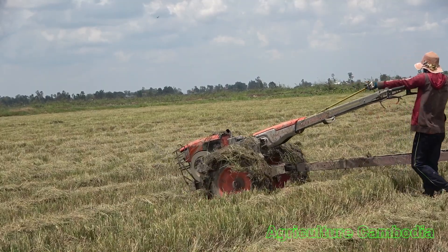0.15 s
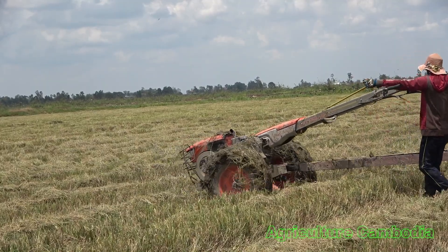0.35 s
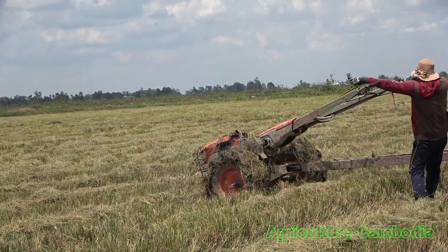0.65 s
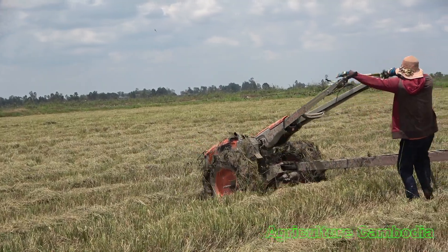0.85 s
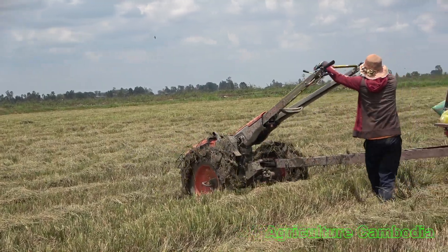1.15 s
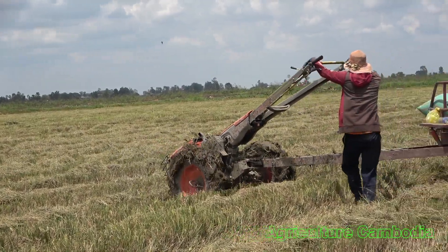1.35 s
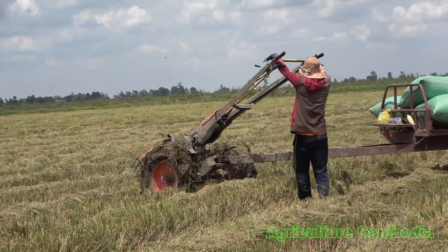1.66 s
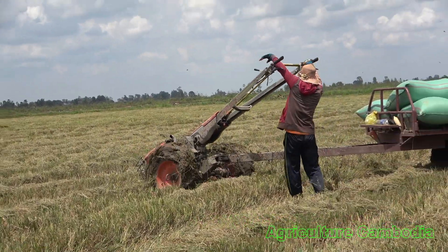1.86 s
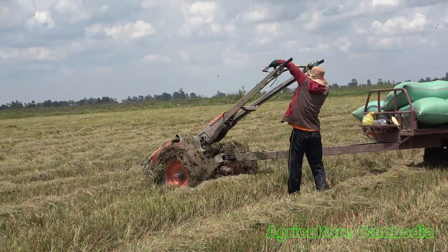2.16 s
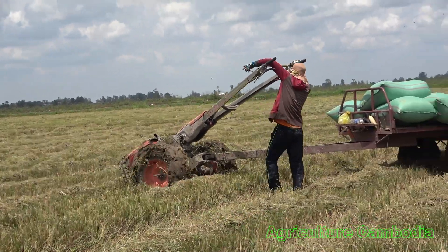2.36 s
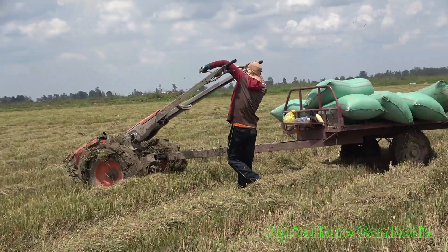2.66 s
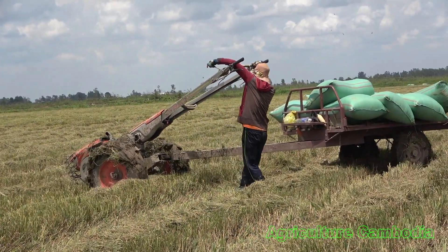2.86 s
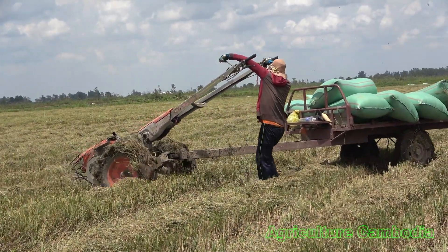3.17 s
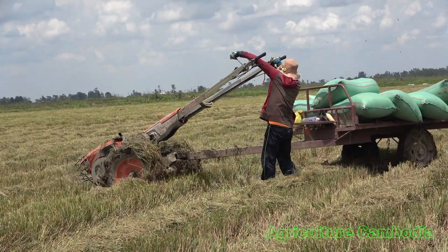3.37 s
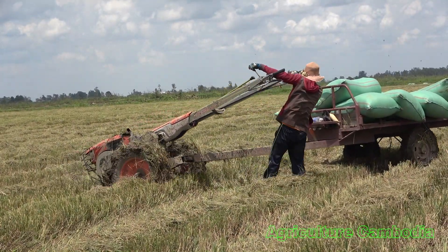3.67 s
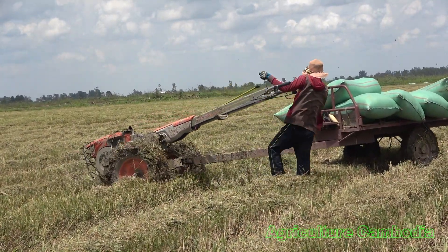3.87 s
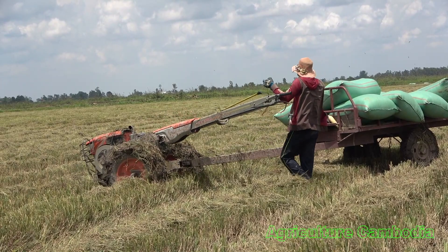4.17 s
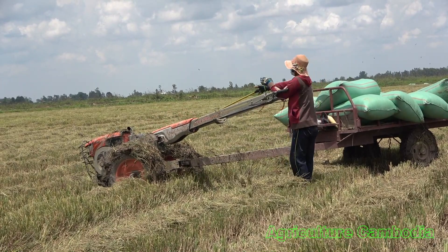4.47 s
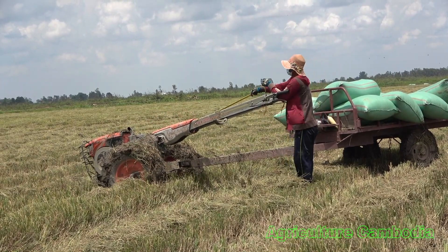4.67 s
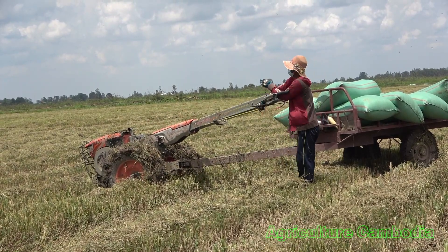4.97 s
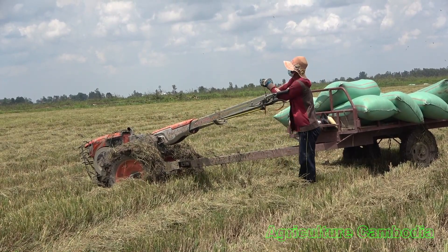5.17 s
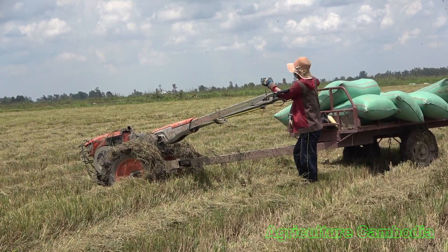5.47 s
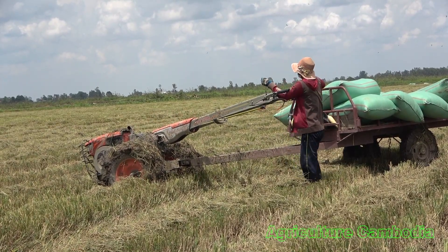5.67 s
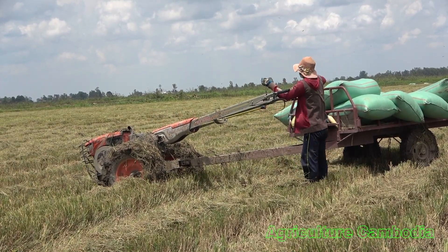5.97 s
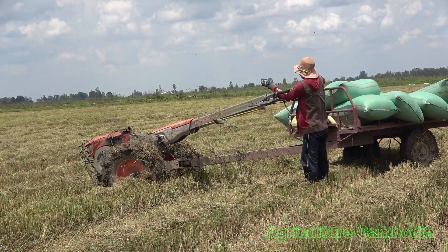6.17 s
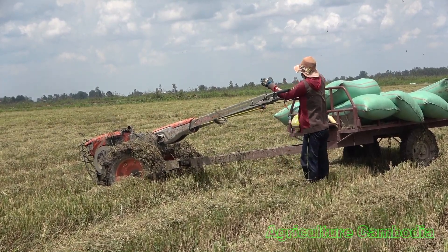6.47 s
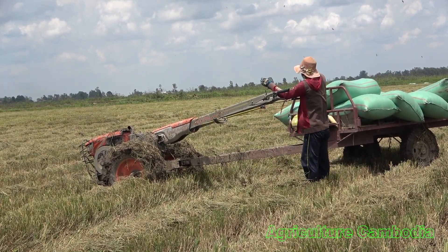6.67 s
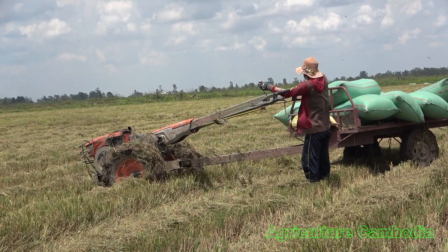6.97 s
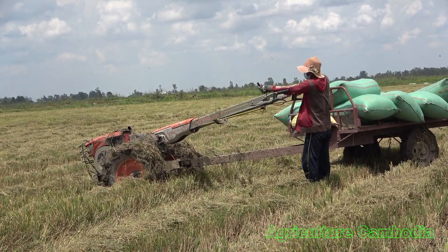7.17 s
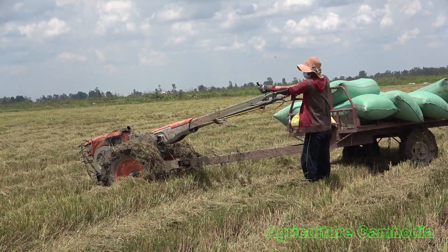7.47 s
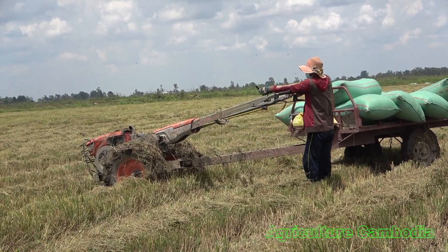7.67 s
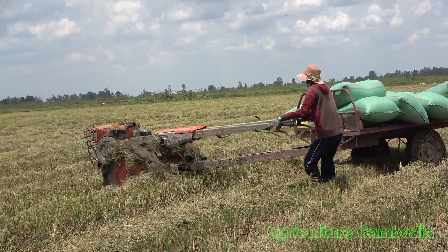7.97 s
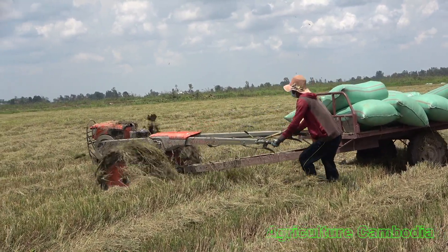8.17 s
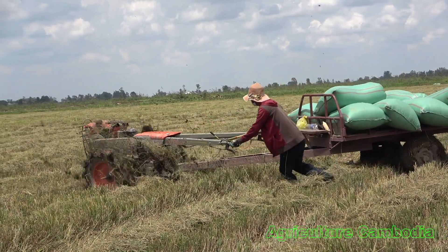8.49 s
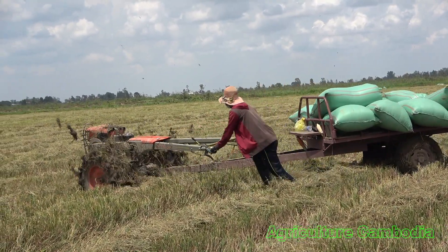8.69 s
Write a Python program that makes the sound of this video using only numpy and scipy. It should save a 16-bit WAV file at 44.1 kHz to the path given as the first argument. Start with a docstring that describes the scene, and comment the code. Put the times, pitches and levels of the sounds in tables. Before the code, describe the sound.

A single-cylinder diesel walking tractor thuds along in a windy field, coasts down to slow clattering puffs, then is throttled up into a fast hammering roar.

```python
"""A single-cylinder diesel walking tractor hauls a trailer over a windy field: it plods, coasts down, then is opened up.
Each cycle brings piston slap, an injector snap, the combustion knock, the exhaust valve, a puff and a tappet tick:
timed impulses and noise bursts that ring the crankcase or the pipe. Gears churn and whine as noise and a wavering tone.
A loose cover buzzes and the hitch clanks a few times; shaped noise makes the straw, the wind and its pops."""
import sys
import numpy as np
from scipy import signal
from scipy.fft import rfft, irfft
from scipy.io import wavfile
from scipy.ndimage import uniform_filter1d

SR = 44100
rng = np.random.default_rng(int(sys.argv[2]) if len(sys.argv) > 2 else 0)


def master_out(mix):
    """Clip the mix to full scale and print it as 16-bit PCM to the path in sys.argv[1]."""
    frames = np.transpose(np.atleast_2d(mix))
    ceiling = np.clip(frames, -1, 1)
    pcm = np.round(ceiling * 32767).astype(np.int16)
    wavfile.write(sys.argv[1], SR, pcm)


N = 389403
TIME = np.arange(N) / SR  # s

# engine speed: start_s, firings_per_s
SPEED = [(0.0, 11.404), (0.4, 12.828), (0.75, 13.789), (1.5, 13.42), (2.4, 13.411), (3.05, 13.663),
         (3.5, 12.739), (4.2, 11.693), (4.8, 10.827), (5.3, 10.201), (5.8, 9.623), (6.03, 9.636),
         (6.25, 11.295), (6.55, 13.061), (6.9, 15.292), (7.25, 17.38), (7.6, 19.348), (7.9, 20.59),
         (8.15, 20.034), (8.45, 20.441), (8.83, 20.763)]
# ring of the crankcase and its covers: pitch_hz, width_hz, level_db above the broad response
CASE = [(1210.5, 125, 12), (1580, 57, -4.5), (3156, 250, 0), (4660, 530, -1.5), (5450, 560, 3.5),
        (6880, 380, 7.5), (11100, 1500, -14)]
# ring of the air cleaner and rocker cover: pitch_hz, width_hz, level_db above the broad response
COVER = [(571, 49, 14.5), (1480, 48, 7)]
# tone of the small hard parts, injector and tappet: pitch_hz, level_db
TAPPET_COLOUR = [(1000, -29), (4000, -6), (7000, 6.5), (11000, 9), (15500, -3.5)]
# how the knock follows the work: level_db when plodding without fuel, full_fuel_db added, db_per_extra_firing_per_s
KNOCK_LAW = (-55, 39.45, .05)
# level of the mechanical clatter as the tractor turns and pitches: start_s, level_db
CLATTER = [(0, -2), (2.0, -1.7), (2.7, 3), (3.5, -1.5), (5.6, 1.7), (6.1, 3.5), (6.8, -2), (8.0, 1.5),
           (8.83, -.8)]


def undb(db):
    """Turn decibels into a gain."""
    return 10 ** (np.asarray(db) / 20)


def curves(table):
    """Draw straight lines between a table's rows: each column at every sample."""
    s, *columns = np.transpose(table)
    return [np.interp(TIME, s, column) for column in columns]


def noise():
    """White noise of unit level."""
    return rng.standard_normal(N)


def walk(rate):
    """Random levels held 1 / rate seconds and smoothed twice; spread near 1."""
    hold = int(SR / rate)
    steps = np.repeat(noise()[:N // hold + 1], hold)
    smooth = uniform_filter1d(uniform_filter1d(steps, hold), hold)
    return np.sqrt(2) * smooth[:N]


def resonance(f, hz, width):
    """Complex response of one damped ringing mode, gain 1 at its centre."""
    return 1j * f * width / (hz ** 2 - f ** 2 + 1j * f * width)


def response(colour, modes=(), size=8192):
    """Impulse response of unit energy: a broad colour with resonant peaks on top."""
    f = np.arange(size // 2 + 1) * SR / size + 1
    hz, db = np.transpose(colour)
    broad = undb(np.interp(np.log(f), np.log(hz), db))
    peaks = sum(np.abs(undb(d) * resonance(f, c, w)) ** 2 for c, w, d in modes)
    gain = broad * np.sqrt(1 + peaks)
    # folding the cepstrum puts all the ringing after the blow
    cepstrum = irfft(np.log(gain))
    ir = irfft(np.exp(rfft(2 * cepstrum[:size // 2], size)))
    return ir / np.linalg.norm(ir)


def ring(x, ir):
    """Let a signal ring through an impulse response."""
    return signal.oaconvolve(x, ir)[:N]


def lowpass(x, hz, order=2):
    """Round off the treble."""
    return signal.sosfilt(signal.butter(order, min(hz, SR / 3), fs=SR, output="sos"), x)


def effort(law):
    """Level in dB of an engine sound that follows fuel and engine speed."""
    # fuel: a blip, part load, cut while coasting, then wide open: start_s, fuel_share (0-1)
    fuel_table = [(.07, 0.24), (.15, 0.64), (.55, 0.62), (.9, .42), (1.25, 0.26), (1.75, 0.53), (1.95, .38),
                  (2.3, 0.54), (3.0, 0.43), (3.35, 0), (6.02, 0.12), (6.08, 0.83), (6.95, 1), (7.3, .95),
                  (7.7, 0.95), (8.1, 0.95), (8.45, 0.96), (8.83, 0.66)]
    plod_per_s = 13  # firings a second at plodding speed
    base_db, fuel_db, speed_db = law
    fuel, = curves(fuel_table)
    rate, = curves(SPEED)
    return base_db + fuel_db * np.clip(fuel, 0, 1) + speed_db * (rate - plod_per_s)


def strokes(crank, angle, scatter_db, jitter_s, lead_s=0):
    """One impulse a cycle at a crank angle (in cycles), uneven in size and timing."""
    cycles = np.arange(np.ceil(crank[0] - angle), crank[-1] - angle)
    size, late = rng.standard_normal((N // 1000, 2))[:len(cycles)].T
    at_s = np.interp(cycles + angle, crank, TIME) + jitter_s * late - lead_s
    train = np.zeros(N)
    train[np.clip((at_s * SR).astype(int), 0, N - 1)] = undb(scatter_db * size)
    return train


def bursts(train, rise_s, decay_s, tail_db=-60, tail_s=.01, repeat=0, size=4096):
    """Noise that swells up to each impulse and dies away after it; a share of the rattle repeats every cycle."""
    t = np.arange(-size, size + 1) / SR
    tail = undb(tail_db) * np.exp(-np.abs(t) / tail_s)
    fall = (np.exp(-np.abs(t) / decay_s) + tail) / (1 + undb(tail_db))
    shape = np.where(t < 0, np.exp(-(t / rise_s) ** 2), fall)
    fresh = signal.oaconvolve(train, shape, mode="same") * noise()
    same = signal.oaconvolve(train, shape * rng.standard_normal(len(t)), mode="same")
    share = np.clip(repeat, 0, 1)
    return np.sqrt(1 - share) * fresh + np.sqrt(share) * same


def wind():
    """Big eddies rumble on the microphone; small ones flutter in quick buffets; gusts lift both."""
    # strength of the breeze: start_s, rumble_db
    breeze = [(0, -13), (1.7, -17.5), (2.35, -19), (2.6, -24.5), (2.8, -12), (3.9, -14.5), (4.45, -14),
              (4.78, -22.5), (4.86, -12.5), (5.3, -15), (5.9, -20.5), (6.1, -12), (6.9, -12), (7.3, -17),
              (7.9, -20.5), (8.55, -14.5), (8.83, -20)]
    # gusts that swell over the breeze: centre_s, length_s, rumble_rise_db, flutter_rise_db
    gusts = [(0.156, 0.062, 6, 9.5), (1.136, 0.4, 1.5, 5.5), (1.41, 0.1, 6, 5.5), (1.66, 0.21, 5, 7.5),
             (3.211, 0.15, 5.5, 10), (3.41, 0.14, 7, 5.5), (3.83, 0.33, 7.5, 6.5), (4.382, 0.06, 4, -0.5),
             (5.682, 0.19, 4.5, -0.5)]
    # tone of the big eddies: pitch_hz, level_db
    rumble_colour = [(8, -10), (20, 3), (45, 2), (75, -0.5), (110, -6.5), (160, -22), (260, -26),
                     (600, -61.5), (4000, -110)]
    # tone of the small eddies: pitch_hz, level_db
    flutter_colour = [(60, -18.5), (120, 6), (170, 2), (260, -8), (380, -11.5), (550, -21.5), (900, -39),
                      (2500, -47), (12000, -87)]
    breeze_db, = curves(breeze)
    gust_db = breeze_db
    eddy_db = -19 + 0.62 * breeze_db  # flutter follows the breeze less steeply
    for s, length_s, rumble_db, flutter_db in gusts:
        swell = np.exp(-(2 * (TIME - s) / length_s) ** 2)
        gust_db = gust_db + rumble_db * swell
        eddy_db = eddy_db + flutter_db * swell
    buffet = walk(28)
    rumble = ring(noise(), response(rumble_colour)) * undb(gust_db + 1.17 * buffet)
    flutter = ring(noise(), response(flutter_colour)) * undb(eddy_db + 1.85 * buffet + 1.5 * walk(90))
    return rumble + flutter


def buffets():
    """Single wind eddies hit the microphone head on and pop: short swells of low noise."""
    # eddies: centre_s, level_db
    eddies = [(1.064, -26), (1.123, -20), (3.135, -13), (3.165, -14), (3.225, -25), (3.434, -18.5),
              (3.447, -29), (4.851, -20)]
    # tone of a pop: pitch_hz, level_db
    pop_colour = [(40, -14), (200, 10), (400, -15), (700, -12.5), (1500, -45), (8000, -71)]
    push = sum(undb(db) * np.exp(-((TIME - s) / 0.0078) ** 2) for s, db in eddies)
    return ring(push * noise(), response(pop_colour))


def stubble():
    """Dry straw rustles under the wheels: bright noise with slow and quick flicker."""
    # tone of the straw: pitch_hz, level_db
    straw_colour = [(500, -4), (5000, 2), (11000, -5.5), (15500, -11)]
    return ring(noise(), response(straw_colour)) * undb(-70 + 1.1 * walk(19) + 1.6 * walk(390))


def hitch():
    """Loose steel fittings of hitch and trailer clank as the load shifts: noise dying away through one resonance."""
    # clanks: start_s, level_db, pitch_hz, width_hz, decay_s
    clanks = [(4.792, -35.5, 6100, 6000, 0.0098), (4.816, -29, 1270, 700, 0.0085),
              (4.837, -30, 1110, 600, 0.0032), (5.115, -49.5, 6000, 6000, .008),
              (5.33, -43, 1840, 400, 0.022)]
    out = np.zeros(N)
    f = np.arange(N // 2 + 1) * SR / N
    for s, db, hz, width, decay_s in clanks:
        band = resonance(f, hz, width) ** 2
        scrape = noise() * (TIME > s) * np.exp(-np.abs(TIME - s) / decay_s)
        band_level = np.sqrt(np.mean(np.abs(band) ** 2))
        out += undb(db) * ring(scrape, irfft(band)[:SR // 20]) / band_level
    return out


def cover(crank):
    """The loose sheet cover resonates at one crank speed, shaken from the compression stroke until the exhaust opens."""
    # level_db when plodding without fuel, full_fuel_db added, db_per_extra_firing_per_s
    buzz_law = (-59, 20.4, 0)
    buzz_per_s, buzz_width_per_s = 13.45, 0.27  # firing rate that buzzes most, and how narrowly
    rate, = curves(SPEED)
    off_speed = (rate - buzz_per_s) / buzz_width_per_s
    buzz_db = effort(buzz_law) - 10 * np.log10(1 + off_speed ** 2)
    shake = bursts(strokes(crank, -0.15, scatter_db=3.8, jitter_s=.001), rise_s=0.0067, decay_s=0.021)
    f = np.arange(N // 2 + 1) * SR / N
    ir = irfft(resonance(f, hz=2810, width=700) ** 2)[:SR // 20]
    return ring(shake * undb(buzz_db + 2 * walk(460)), ir / np.linalg.norm(ir))


def gears(crank):
    """Gear teeth take up their play unevenly and churn; the timing gears whine, smeared by uneven turning."""
    # level_db when plodding without fuel, full_fuel_db added, db_per_extra_firing_per_s
    gear_law = (-42.5, 1.56, 1.0)
    # tone the gears feed into the case: pitch_hz, level_db
    gear_colour = [(150, 11), (600, 0), (850, -1), (1200, -3), (1900, -6.5), (3300, -13), (5300, -15.5),
                   (6200, -25.5), (8000, -27), (11000, -23.5), (15500, -39)]
    teeth_per_cycle = 112
    clatter_db, = curves(CLATTER)
    gear_db = effort(gear_law) + clatter_db
    churn = noise() * undb(gear_db + 2.0 * walk(170))
    whine = np.sin(2 * np.pi * teeth_per_cycle * crank + 4.0 * walk(220)) * undb(gear_db - 15.0)
    return whine + ring(churn, response(gear_colour, CASE))


def tappet(crank):
    """The valve gear ticks once a cycle: a short noise burst rings the case."""
    tick = bursts(strokes(crank, 0.64, scatter_db=7.5, jitter_s=0.00063), rise_s=.0007, decay_s=0.0028)
    return ring(tick * undb(-60), response(TAPPET_COLOUR, CASE))


def exhaust_valve(crank):
    """Gas cracks past the opening exhaust valve: a noise burst sounds through the case and cover."""
    # level_db when plodding without fuel, full_fuel_db added, db_per_extra_firing_per_s
    valve_law = (-49, -10, 1.33)
    # tone the valve feeds into the case: pitch_hz, level_db
    valve_colour = [(300, 5), (900, 8), (1300, 12), (1900, 6), (2900, -0.5), (3800, -1), (5200, 1),
                    (6200, -9), (9000, -11.5), (11500, -17), (15500, -26)]
    clatter_db, = curves(CLATTER)
    hiss = bursts(strokes(crank, 0.19, scatter_db=2.0, jitter_s=0.00038), rise_s=0.0064, decay_s=0.0054)
    valve_db = effort(valve_law) + clatter_db + 15.5
    return ring(hiss * undb(valve_db), response(valve_colour, CASE + COVER))


def piston_slap(crank):
    """The inlet valve seats, then the piston rocks over on its way up; both knock the case and cover."""
    # level_db when plodding without fuel, full_fuel_db added, db_per_extra_firing_per_s
    slap_law = (-43, 15.16, 0.09)
    # tone the slap feeds into the case: pitch_hz, level_db
    slap_colour = [(200, 5), (550, -6), (720, 5), (930, 2), (1200, 0.5), (1550, 4.5), (2200, 0),
                   (2950, -5.5), (3600, -12), (5400, -24), (6300, -23), (10000, -29), (15500, -41)]
    clatter_db, = curves(CLATTER)
    seating = strokes(crank, -0.25, scatter_db=2.1, jitter_s=.00015)
    inlet = bursts(seating, rise_s=0.0022, decay_s=0.013, repeat=0.39)
    rocking = strokes(crank, -0.18, scatter_db=4.0, jitter_s=0.00091)
    piston = bursts(rocking, rise_s=0.002, decay_s=0.0046)
    slap_db = effort(slap_law) + clatter_db - 2.0
    return ring((inlet + piston) * undb(slap_db), response(slap_colour, CASE + COVER))


def silencer(train, size=8192):
    """Soft pressure pulses ring the pipe; a unit pulse peaks at 1."""
    # pipe resonances: pitch_hz, width_hz, level_db relative to each other
    pipe = [(226, 29, 10), (275.3, 25.4, 15), (337, 22, -20), (424, 42, -21), (546, 82, -8.5),
            (690, 42, -22)]
    f = np.arange(size // 2 + 1) * SR / size
    modes = sum(undb(db) * resonance(f, hz, width) for hz, width, db in pipe)
    ir = lowpass(irfft(modes), hz=920, order=6)
    return ring(train, ir / np.abs(ir).max())


def exhaust(crank):
    """The block jolts one way at firing and the gas puffs the other; both ring the silencer and merge into a hum at speed."""
    # both laws: level_db when plodding without fuel, full_fuel_db added, db_per_extra_firing_per_s
    jolt_law = (-49, 25.6, 0.75)
    puff_law = (-26, 1.0, 0.66)
    jolt_angle, puff_angle = -.1, .235  # cycles
    jolts = strokes(crank, jolt_angle, scatter_db=1.2, jitter_s=0) * undb(effort(jolt_law))
    puffs = strokes(crank, puff_angle, scatter_db=0.5, jitter_s=0) * undb(effort(puff_law))
    gas = bursts(puffs, rise_s=0.0016, decay_s=0.0024)
    return silencer(puffs - jolts + undb(-36.5) * gas)


def injector(crank):
    """The injector needle snaps just before the fuel lights, louder when the knock is louder."""
    needle_db = 0.61 * effort(KNOCK_LAW) - 27.5
    needle = strokes(crank, 0, scatter_db=3.0, jitter_s=.0002, lead_s=0.004) * undb(needle_db)
    return ring(bursts(needle, rise_s=0.0009, decay_s=0.0061), response(TAPPET_COLOUR, CASE))


def combustion(crank):
    """The fuel lights: a blunt, uneven blow and a harsh crack ring the case."""
    # treble of the crack: level_db when plodding without fuel, full_fuel_db added, db_per_extra_firing_per_s
    hardness_law = (3.7, -5, -0.44)
    # tone the knock feeds into the case: pitch_hz, level_db
    knock_colour = [(200, -2), (500, -8.5), (800, -8), (1050, 2.5), (1450, 3), (2100, -1), (2800, -7),
                    (3700, -4.5), (5400, -7.5), (6200, -19), (8000, -18), (11000, -22.5), (15500, -44)]
    firings = strokes(crank, -.012, scatter_db=0.8, jitter_s=.0001) * undb(effort(KNOCK_LAW))
    crack = bursts(firings, rise_s=0.0025, decay_s=0.0029, tail_db=-18, tail_s=0.013, repeat=0.46)
    dull = lowpass(crack, hz=2800, order=1)
    crack = dull + undb(effort(hardness_law)) * (crack - dull)  # a steeper pressure rise reaches higher
    blow = lowpass(firings * undb(2.7 * walk(30)), hz=1500)
    return ring(undb(3.5) * crack + undb(18) * blow, response(knock_colour, CASE))


def scene():
    """The crank drives every engine sound; the open field adds no echo."""
    first_phase = .1935  # cycles
    rate, = curves(SPEED)
    crank = first_phase + np.cumsum(rate) / SR  # cycles turned so far
    field = wind() + buffets() + stubble() + hitch()
    mechanism = cover(crank) + gears(crank) + tappet(crank) + exhaust_valve(crank) + piston_slap(crank)
    engine = mechanism + exhaust(crank) + injector(crank) + combustion(crank)
    return (field + engine)[None]


def record(dry):
    """Softly round the biggest peaks, then cut the top of the treble steeply."""
    top_hz = 15800
    limited = dry / (1 + dry ** 6) ** (1 / 6)
    return signal.sosfilt(signal.ellip(8, .2, 70, top_hz, fs=SR, output="sos"), limited)


dry = scene()
out = record(dry)
master_out(out)
```